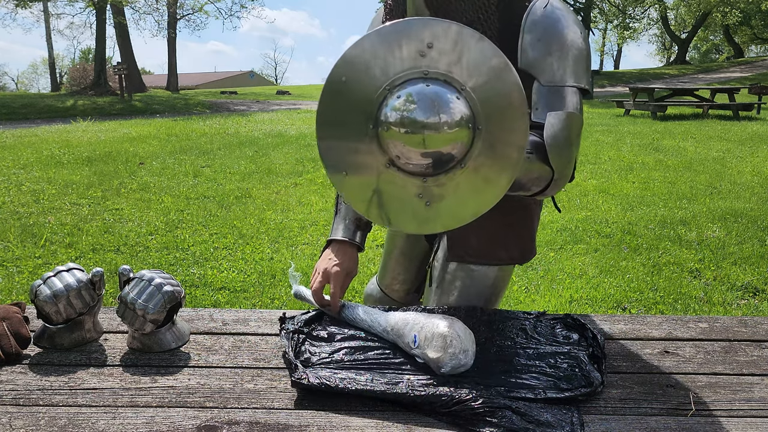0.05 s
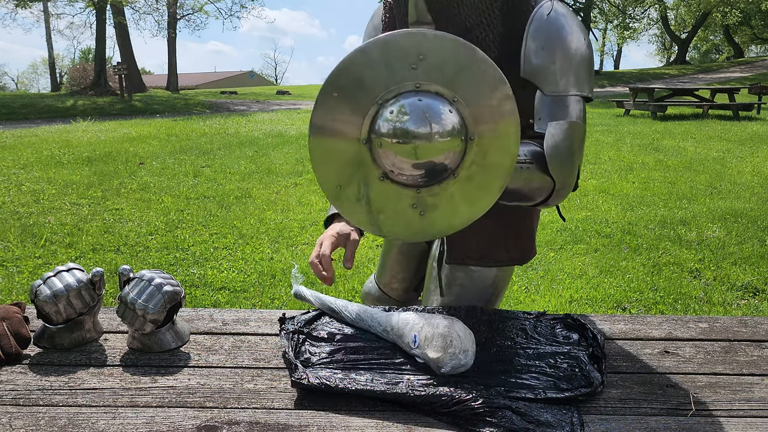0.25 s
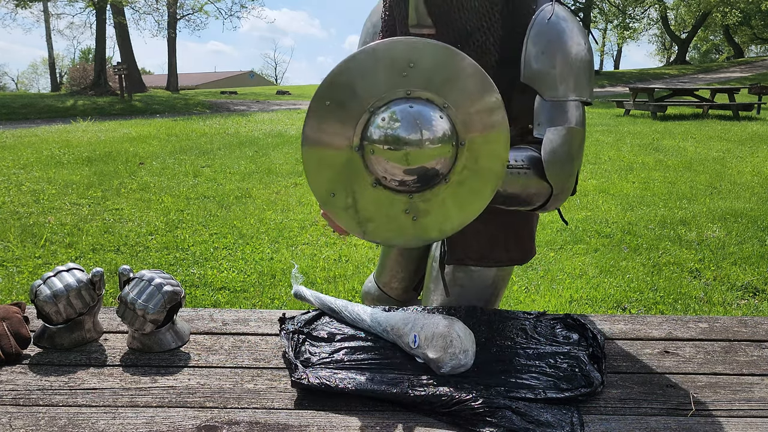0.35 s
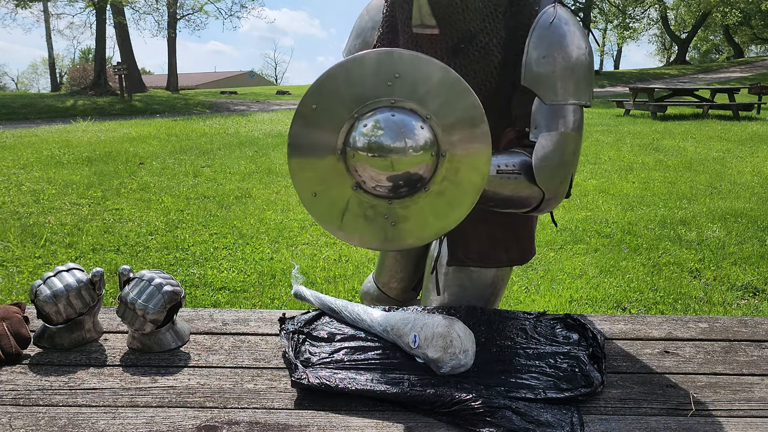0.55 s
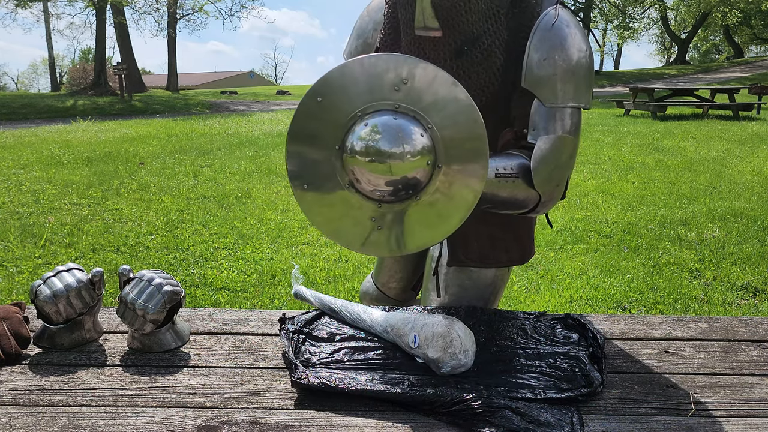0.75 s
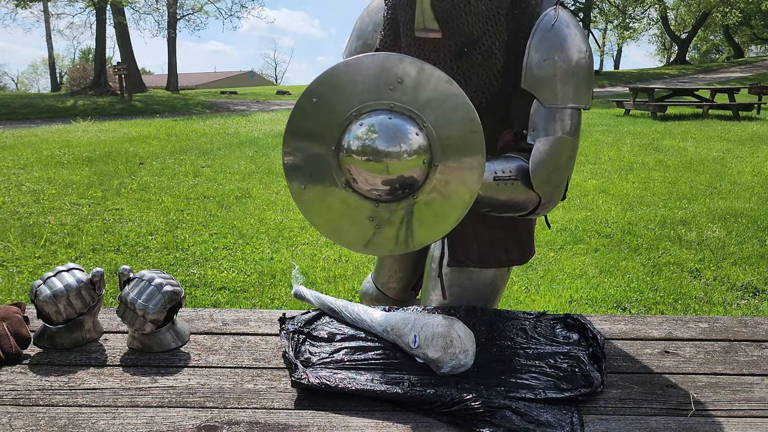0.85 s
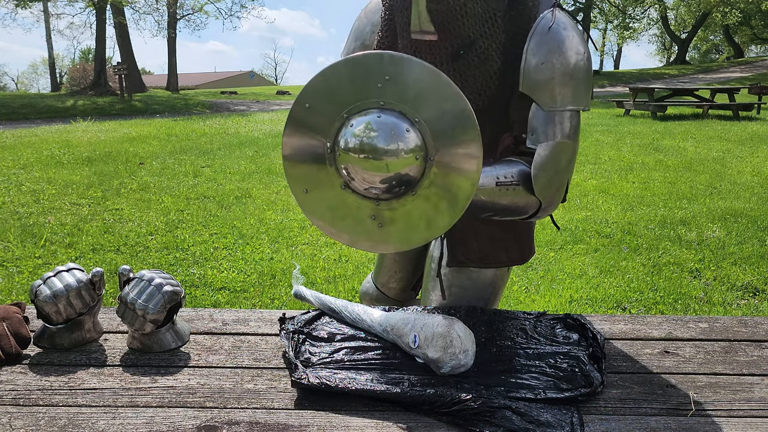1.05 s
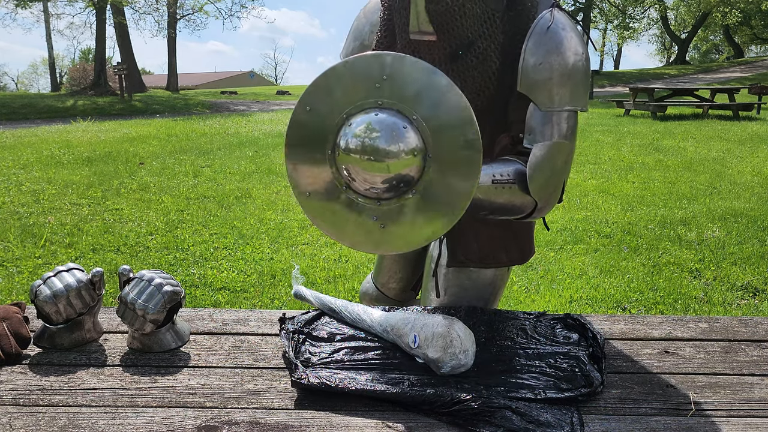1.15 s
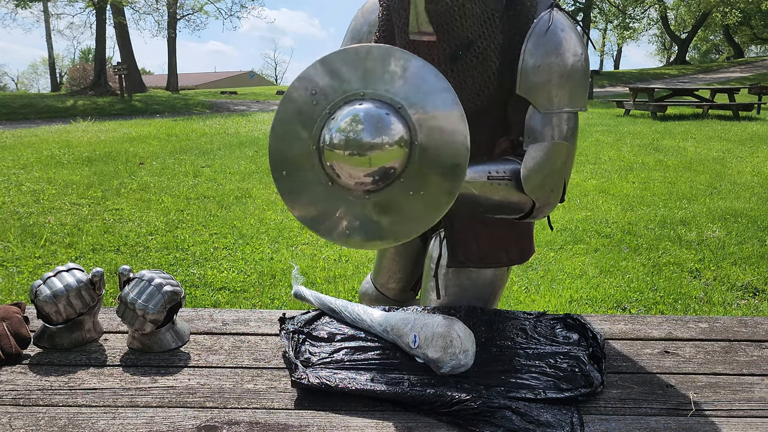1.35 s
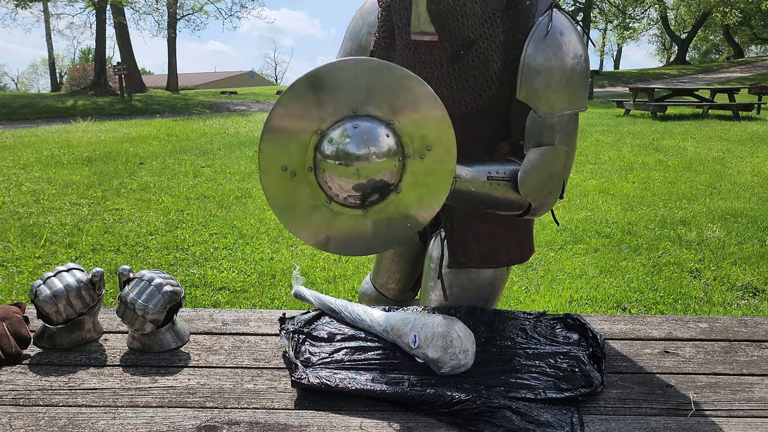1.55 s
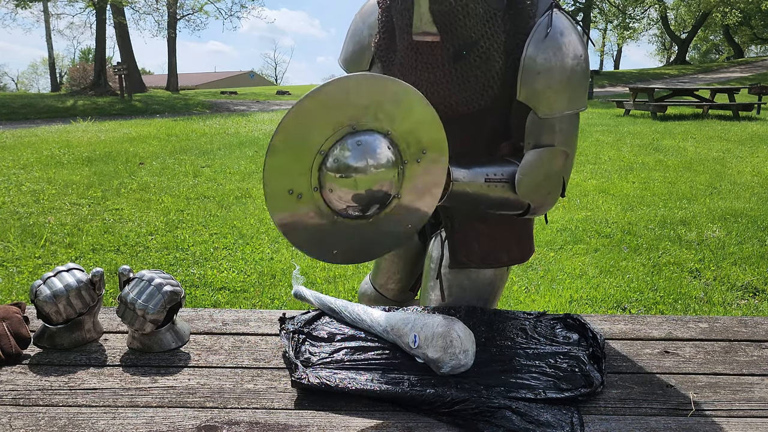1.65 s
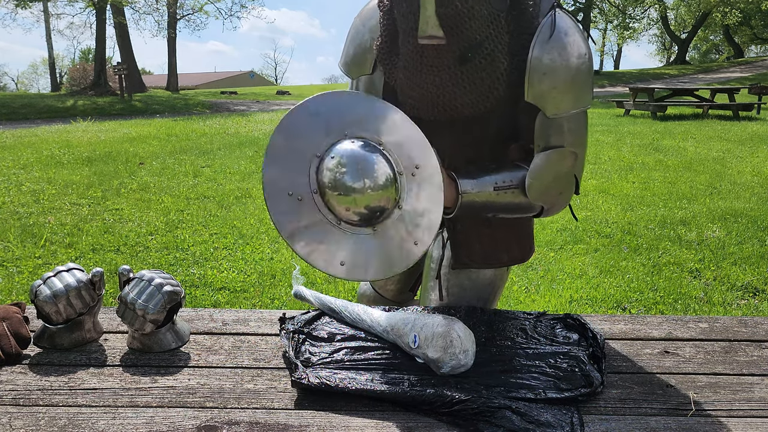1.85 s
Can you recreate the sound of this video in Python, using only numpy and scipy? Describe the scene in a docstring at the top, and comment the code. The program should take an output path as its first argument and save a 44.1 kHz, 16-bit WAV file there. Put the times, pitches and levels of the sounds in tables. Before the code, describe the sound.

Three sharp, ringing clanks on a metal shield, with armour scraping and clinking outdoors.

```python
"""A small steel shield is knocked hard three times; each clank buzzes for a moment, then the disc rings out.
Plate armour taps, scrapes and clinks in between as the wearer shifts, with dull rubs and soft thumps.
The ringing is a set of fading pure tones; the scraping is many tiny slips of one surface on another.
Behind it is a park: airy hiss, a distant engine hum and a small bird. The background fades at the end."""
import sys
import numpy as np
from scipy import signal
from scipy.fft import rfft, irfft, next_fast_len
from scipy.io import wavfile
from scipy.ndimage import uniform_filter1d, minimum_filter1d, map_coordinates

SR = 44100
rng = np.random.default_rng(int(sys.argv[2]) if len(sys.argv) > 2 else 0)


def wrap_up_sound(samples):
    """Save the sound to the file named by the first command line argument, as 16-bit audio."""
    columns = np.atleast_2d(samples).T
    # keep every value between -1 and 1, then stretch to whole-number steps
    tamed = np.clip(columns, -1, 1)
    steps = np.round(tamed * 32767).astype(np.int16)
    wavfile.write(sys.argv[1], SR, steps)


N = 83790  # 1.9 seconds


def amp(db):
    """Turn decibels into a number to multiply by."""
    return 10 ** (np.asarray(db) / 20)


def unit(x):
    """Scale a sound to an average (rms) level of 1."""
    return x / np.sqrt(np.mean(x ** 2) + 1e-20)


def along(points, hz):
    """Read between (Hz, value) points, with octaves evenly spaced."""
    point_hz, values = np.transpose(points)
    return np.interp(np.log(hz + 1), np.log(point_hz + 1), values)


def since(start):
    """Seconds since the start, zero before it."""
    return np.maximum(np.arange(N) / SR - start, 0)


def wobble(rate):
    """A smooth curve through `rate` random values a second."""
    return map_coordinates(rng.standard_normal(int(N * rate / SR) + 4), [np.arange(N) * rate / SR])


def filtered(x, gain_at):
    """Turn each frequency up or down by gain_at(hz)."""
    size = next_fast_len(N + SR // 4)
    return irfft(rfft(x, size) * gain_at(np.fft.rfftfreq(size, 1 / SR)), size)[:N]


def noise(colour, tilt_db=0):
    """Noise with a colour (how strong each frequency is), tilted by tilt_db per octave."""
    white = rng.standard_normal(N)
    return unit(filtered(white, lambda hz: amp(along(colour, hz) + tilt_db * np.log2(hz + 1))))


def stroke(start, length, peak=0.3):
    """A quick, smooth swell and a slower fall."""
    return np.sin(np.pi * np.interp(since(start) / length, [0, peak, 1], [0, .5, 1]))


def swells(strokes):
    """One loudness curve from many strokes."""
    return sum(amp(db) * stroke(start, length) for start, length, db in strokes)


def plate_resonance(x, depth_db=3.5, spacing_hz=30.33):
    """A thin plate favours many irregularly spaced frequencies."""
    bumps = rng.standard_normal(4096)
    ripple = lambda hz: np.tanh(2 * map_coordinates(bumps, [hz / spacing_hz], mode="wrap"))
    return unit(filtered(x, lambda hz: amp(depth_db * ripple(hz))))


def friction(strokes, colour, smooth, slips_per_s=900, catch_db=1.5):
    """Sliding surfaces catch and slip, shaking a plate; `smooth` adds even hiss."""
    slips = unit((rng.random(N) < slips_per_s / SR) * rng.standard_normal(N))
    sliding = slips + smooth * rng.standard_normal(N)
    coloured = filtered(sliding, lambda hz: amp(along(colour, hz)))
    catching = amp(catch_db * wobble(120))
    return plate_resonance(coloured * catching) * swells(strokes)


# The air over time. Each row: time in seconds, then low, middle and hiss levels in dB before trimming.
AIR_LEVELS = [(0, -39, -39.5, -47), (.16, -42.5, -39, -44), (.35, -38.5, -36.5, -40),
              (.44, -36.5, -39.5, -41), (0.512, -36.5, -46, -47), (.67, -37, -50.5, -39.5),
              (.78, -42, -45.5, -49), (.98, -40, -47.5, -42), (1.07, -41.5, -46.5, -45),
              (1.22, -42.5, -51.5, -51), (1.32, -42, -45.5, -50.5), (1.48, -42, -49, -38),
              (1.56, -46, -52, -53), (1.69, -50.5, -57, -57.5), (1.9, -61, -66.5, -64.5)]
# The colours of those three bands. Each row: frequency in Hz, relative level in dB.
LOW_COLOUR = [(25, -29.5), (45, -39), (70, 5.5), (100, -5), (170, -0.5), (380, -0.5), (700, -8),
              (1200, -11.5), (2500, -44)]
MID_COLOUR = [(500, -12), (1300, 3.5), (2500, 2), (4500, -0.5), (6000, -6), (9000, -35)]
HISS_COLOUR = [(3000, -22), (6200, 3), (9500, 3), (12000, 0.5), (15500, 1.5)]


def park_air(trims_db=(0.5, -0.5, 2.5), waver_db=1.78):
    """Outdoor air: three bands of noise, each wavering a little."""
    times, *bands = np.transpose(AIR_LEVELS)
    out = np.zeros(N)
    for colour, levels, trim_db in zip([LOW_COLOUR, MID_COLOUR, HISS_COLOUR], bands, trims_db):
        db = np.interp(since(0), times, levels) + trim_db
        out += noise(colour) * amp(db + waver_db * wobble(70))
    return out


# The engine's tones. Each row: pitch in Hz, level in dB.
ENGINE_TONES = [(71, -50), (140.2, -42.5)]


def engine_hum(drift_rad=0.9, waver_db=0.5, fade_start_s=1.52, fade_db_per_s=52):
    """A far engine's two lowest tones drift slightly, then fade."""
    tones = sum(amp(db + waver_db * wobble(10.6))
                * np.sin(2 * np.pi * hz * since(0) + drift_rad * wobble(9.3)) for hz, db in ENGINE_TONES)
    return tones * amp(-fade_db_per_s * since(fade_start_s))


# The rubs. Each row: start in seconds, length in seconds, level in dB.
RUB_STROKES = [(.125, 0.05, -35.5), (.435, .03, -32.5), (1.214, 0.01, -38), (1.241, 0.024, -34),
               (1.26, 0.054, -24), (1.30, 0.054, -29), (1.331, 0.033, -36), (1.36, 0.029, -40.5)]
# Their colour. Each row: frequency in Hz, relative level in dB.
RUB_COLOUR = [(80, -29), (170, -8), (290, -13.5), (420, 1.5), (750, -4.5), (1050, -0.5), (1350, -9),
              (1700, -7.5), (2000, -20), (2750, -11), (3100, -22.5), (6000, -24), (15500, -26.5)]


def strap_rubs():
    """A strap rubs on armour with a dull, grainy sound."""
    return friction(RUB_STROKES, RUB_COLOUR, smooth=1.5)


# The shield's own tones. Each row: pitch in Hz, seconds to fade by 60 dB (called t60),
# then the level in dB when struck at spot 0, spot 1 and spot 2.
SHIELD_TONES = [(182, .2, -40, -27, -40), (361, .24, -23, -17, -25), (443, .12, -18, -19, -21),
                (461, .48, -29, -20, -19), (748, .17, -31, -26, -17), (942, .26, -24, -22, -29),
                (1026, .37, -19, -32, -12), (1054, .32, -17, -21, -25), (1094, .22, -23, -25, -8),
                (1125, .15, -9, -6, -26), (1211, .22, -12, -16, -12), (1287, .25, -12, -30, -36),
                (1329, .27, -18, -35, -42), (1370, .22, -18, -29, -34), (2152, .13, -31, -27, -17),
                (2336, .16, -28, -34, -21), (2401, .22, -24, -36, -35), (2547, .13, -30, -19, -22),
                (3257, .38, -40, -34, -45), (3900, .17, -24, -30, -28), (4027, .14, -30, -26, -16),
                (4316, .16, -28, -16, -28), (4610, .16, -25, -21, -33), (4854, .14, -33, -23, -10),
                (6690, .13, -33, -20, -26), (7435, .11, -42, -34, -15), (7725, .1, -42, -14, -30),
                (11400, .09, -44, -26, -27)]


def shield_ring(start, spot, sustain, rise_s=0.0031, scatter_db=2.43, waver_rad=0.067):
    """The spot struck sets each tone's strength; anything touching the disc shortens the ring."""
    t, out = since(start), np.zeros(N)
    for hz, t60, *spot_db in SHIELD_TONES:
        phase = 2 * np.pi * (hz * t + rng.random())
        phase += waver_rad * np.interp(t, np.linspace(0, 1, 100), rng.standard_normal(100))
        db = spot_db[spot] + scatter_db * rng.normal()
        out += amp(db - 60 * t / (t60 * sustain)) * np.sin(phase)
    return out * (1 - np.exp(-t / rise_s))


# The colours of the first crack and the crash. Each row: frequency in Hz, relative level in dB.
CRACK_COLOUR = [(500, -28.5), (2500, 0.5), (6000, 0), (10000, -5.5), (15500, -6.5)]
CRASH_COLOUR = [(25, -56), (70, -30.5), (160, -6), (400, 3.5), (620, 1.5), (850, 2), (1200, 5), (1650, -2),
                (2300, -1.5), (2950, -8.5), (4400, 1.5), (5700, -5.5), (7500, -2.5), (9500, -8),
                (12000, -10), (15500, -21)]
# How the crash dies. Each row: frequency in Hz, seconds to fade by 60 dB.
CRASH_FADE = [(200, .2), (1200, 0.13), (2500, 0.19), (4500, 0.11), (8000, 0.056), (15000, 0.11)]


def shield_crash(start, tilt_db, buzz_s, rise_s=0.00027, crack_db=2.5, crack_t60=0.038):
    """Contact makes a sharp crack; crowded resonances hold while it buzzes, then die away."""
    wash = plate_resonance(noise(CRASH_COLOUR, tilt_db))
    hz, t, bands = signal.stft(wash, SR, nperseg=256)  # split so each band fades at its own speed
    fade = amp(-60 * np.maximum(t - start - buzz_s, 0) / along(CRASH_FADE, hz)[:, None])
    crash = signal.istft(bands * fade, SR, nperseg=256)[1][:N]
    crack = noise(CRACK_COLOUR) * amp(crack_db - 60 * since(start) / crack_t60)
    return (crash + crack) * (1 - np.exp(-since(start) / rise_s))


# Hard knocks and light taps. Each row: start in seconds, spot struck, ring level in dB, ring time as a
# share of the free shield's, crash level in dB, brightness in dB per octave, buzz in seconds.
SHIELD_KNOCKS = [(.2075, 0, 1, 0.72, -14.5, -1.06, 0.0088), (.2260, 0, 0, 0.81, -20, -2, 0.01),
                 (.262, 0, -10.5, 1, -27, 0, 0.021), (.409, 0, -18.5, 1, -26.5, 2.5, 0.0072),
                 (0.5423, 1, 0.5, 0.97, -13, 0.5, 0.012), (0.7018, 1, -17.5, 0.92, -25, -2, .002),
                 (0.838, 2, 0.5, 0.96, -15, 0.5, 0.022), (1.408, 0, -33, 0.64, -29, -1, 0.0057)]


def shield_knocks():
    """Every knock makes the steel crash and ring."""
    return sum(amp(ring_db) * shield_ring(start, spot, sustain)
               + amp(crash_db) * shield_crash(start, tilt_db, buzz_s)
               for start, spot, ring_db, sustain, crash_db, tilt_db, buzz_s in SHIELD_KNOCKS)


# The scrapes. Each row: start in seconds, length in seconds, level in dB.
SCRAPE_STROKES = [(.24, 0.097, -19.5), (.375, 0.057, -32), (.428, 0.046, -29.5), (.565, .035, -19.5),
                  (.63, 0.067, -47), (.836, 0.0055, -22.5), (.925, .04, -42), (.97, 0.036, -41.5),
                  (1.255, 0.023, -36.5), (1.36, .05, -49), (1.44, 0.044, -44.5)]
# Their colour. Each row: frequency in Hz, relative level in dB.
SCRAPE_COLOUR = [(150, -34), (600, -11.5), (1200, 11), (2000, -5), (3000, -2), (4300, 6), (5500, -1),
                 (6600, -0.5), (8500, -3.5), (15500, -12)]


def armour_scrapes():
    """Steel slides on steel, brighter and smoother than the rubs."""
    return friction(SCRAPE_STROKES, SCRAPE_COLOUR, smooth=3.3)


# Small plates. Each row: start in seconds, pitch in Hz, level in dB, seconds to fade by 60 dB.
PLATE_NOTES = [(0.313, 4440, -29.5, 0.29), (0.7011, 2434, -26, 0.12), (.7015, 3570, -22.5, 0.062),
               (.7015, 4650, -41, 0.051), (1.099, 1363, -31, 0.036), (1.242, 1640, -29, 0.06),
               (1.242, 2110, -35, 0.05), (1.337, 895, -24, 0.049), (1.41, 1474, -24, 0.048)]


def armour_clinks(rise_s=0.0013):
    """Loose plates each ring with one note."""
    out = np.zeros(N)
    for start, hz, db, t60 in PLATE_NOTES:
        t = since(start)
        out += amp(db - 60 * t / t60) * np.sin(2 * np.pi * hz * t) * (1 - np.exp(-t / rise_s))
    return out


# The thumps. Each row: start in seconds, length in seconds, level in dB.
THUMP_STROKES = [(.435, 0.089, -41.5), (0.53, .06, -38), (0.66, 0.063, -36)]
# Their colour. Each row: frequency in Hz, relative level in dB.
THUMP_COLOUR = [(25, -32.5), (50, -9.5), (75, 1), (130, 0), (220, -9), (500, -51)]


def body_thumps():
    """The body thumps softly: short swells of deep noise."""
    return noise(THUMP_COLOUR) * swells(THUMP_STROKES)


# The bird's song. Each row: start and length in seconds, first and last pitch in Hz, level in dB.
BIRD_NOTES = [(1.453, 0.051, 2320, 2330, -43), (1.479, 0.039, 3980, 3650, -51),
              (1.739, 0.037, 3980, 3650, -55), (1.778, 0.0584, 3560, 3220, -54.5),
              (1.788, 0.11, 4660, 4640, -62), (1.827, 0.053, 3260, 3200, -58.5),
              (1.855, 0.041, 2100, 2610, -61)]


def bird(pitch_waver=0.0123, flutter_db=2, echo_t60=0.26, echo_db=-6):
    """Short wavering whistles, scattered by the trees."""
    song = np.zeros(N)
    for start, length, first_hz, last_hz, db in BIRD_NOTES:
        hz = np.interp(since(start), [0, length], [first_hz, last_hz]) * (1 + pitch_waver * wobble(300))
        loudness = amp(db + flutter_db * wobble(120)) * stroke(start, length)
        song += loudness * np.sin(2 * np.pi * np.cumsum(hz) / SR)
    tail = rng.standard_normal(N) * amp(-60 * since(0) / echo_t60)
    echo = signal.fftconvolve(song, tail / np.linalg.norm(tail))[:N]
    return song + amp(echo_db) * echo


def scene():
    """Shield and armour close by, the park behind, in one channel."""
    wearer = armour_scrapes() + strap_rubs() + armour_clinks() + body_thumps()
    return (shield_knocks() + wearer + park_air() + engine_hum() + bird())[None]


def record(dry, ceiling=0.99, hold_s=0.0016, top_hz=15750):
    """A fast limiter turns down the loudest peaks, then the highest treble is cut."""
    width = int(hold_s * SR)
    safe_gain = np.minimum(1, ceiling / (np.abs(dry[0]) + 1e-9))
    smooth_gain = uniform_filter1d(minimum_filter1d(safe_gain, width), width)
    return filtered(dry[0] * smooth_gain, lambda hz: hz < top_hz)[None]


dry = scene()
out = record(dry)
wrap_up_sound(out)
```